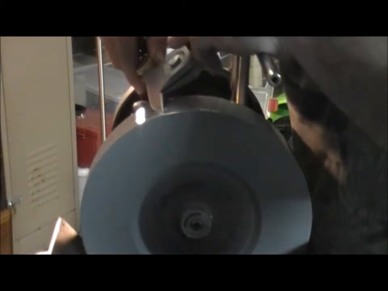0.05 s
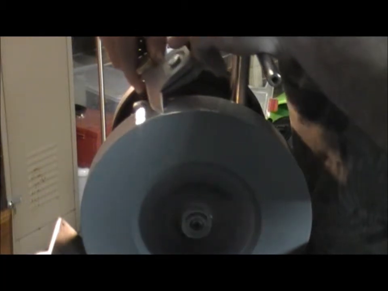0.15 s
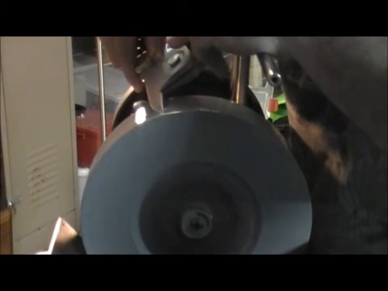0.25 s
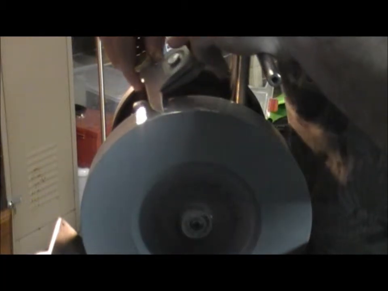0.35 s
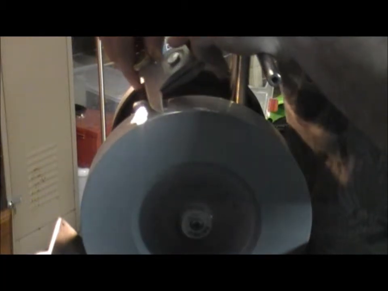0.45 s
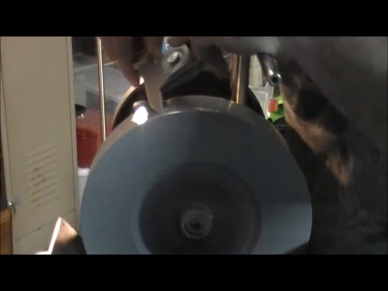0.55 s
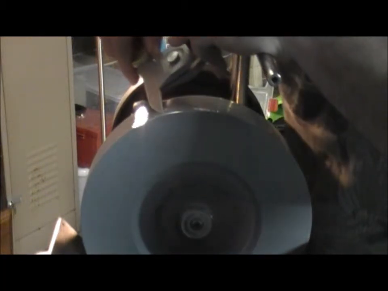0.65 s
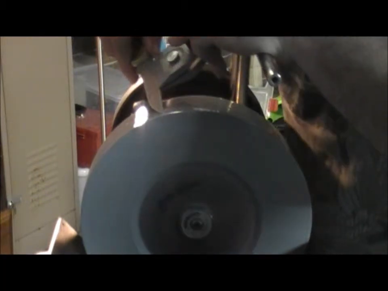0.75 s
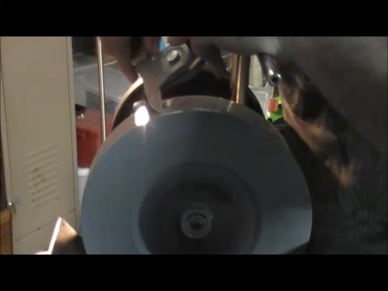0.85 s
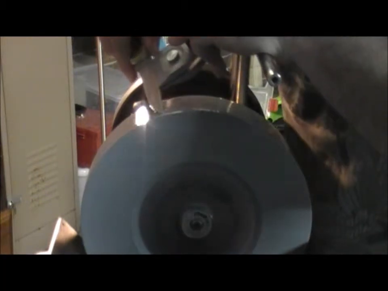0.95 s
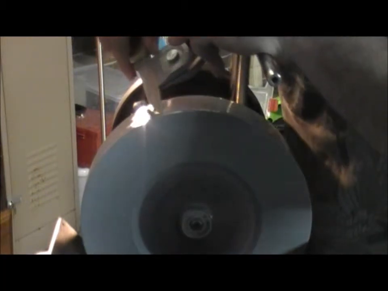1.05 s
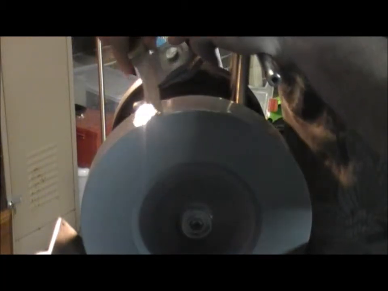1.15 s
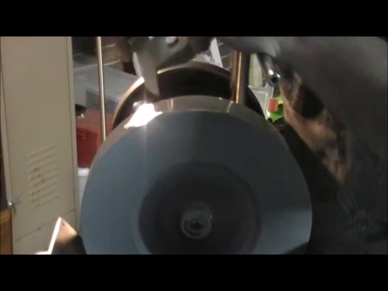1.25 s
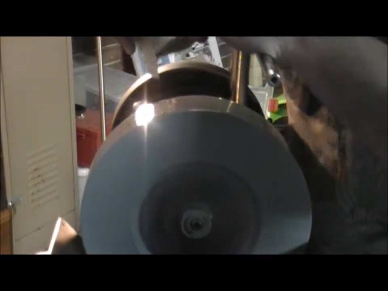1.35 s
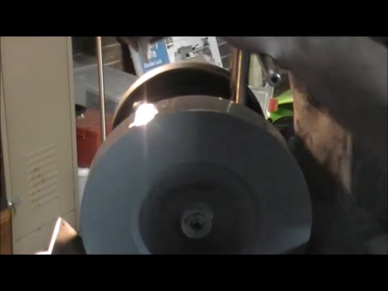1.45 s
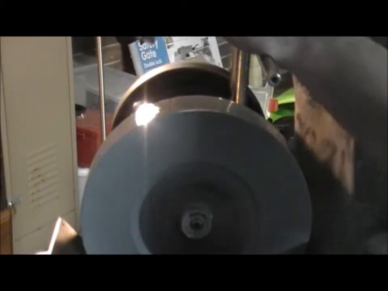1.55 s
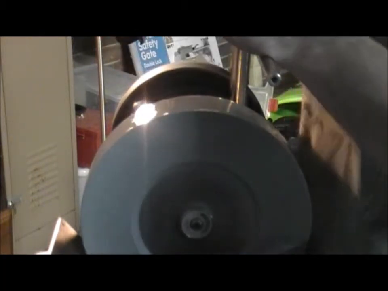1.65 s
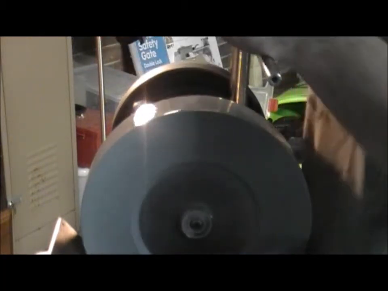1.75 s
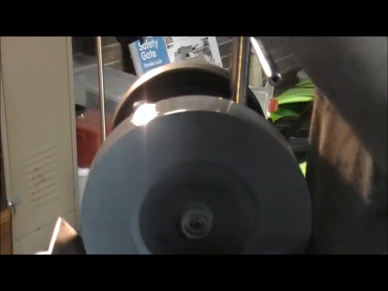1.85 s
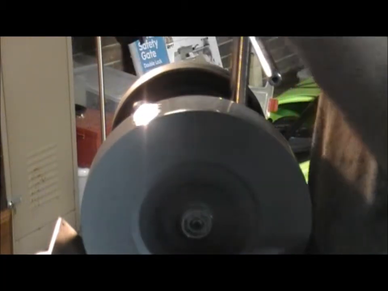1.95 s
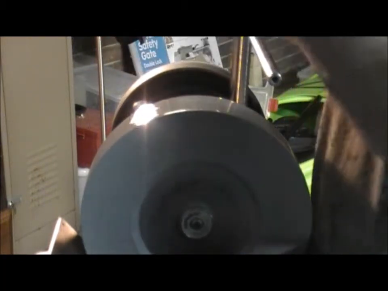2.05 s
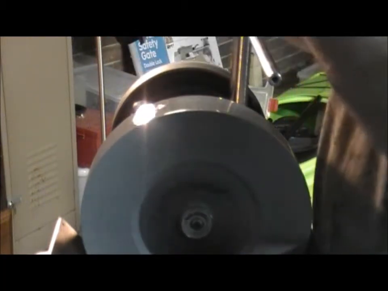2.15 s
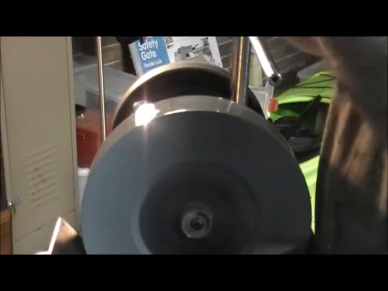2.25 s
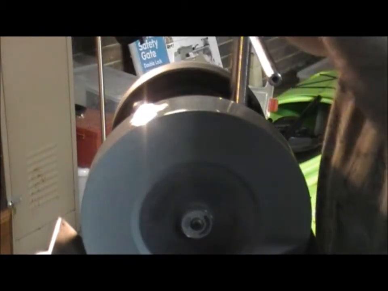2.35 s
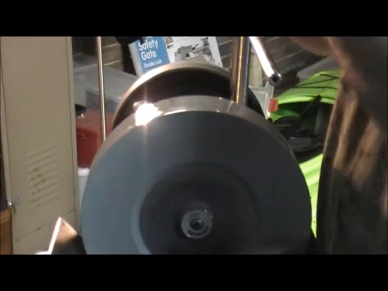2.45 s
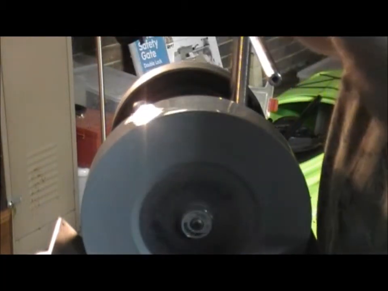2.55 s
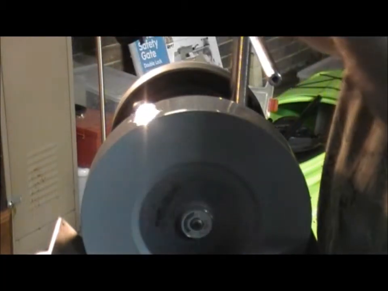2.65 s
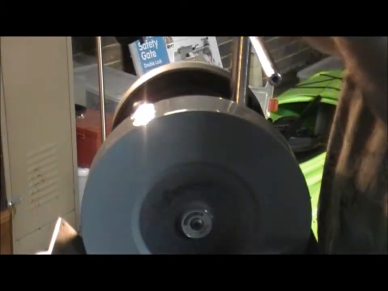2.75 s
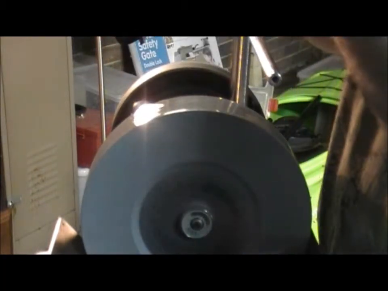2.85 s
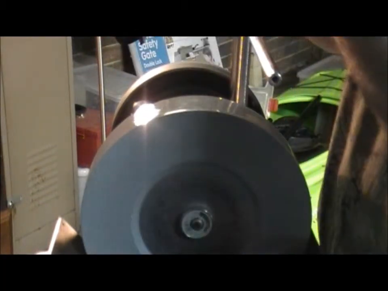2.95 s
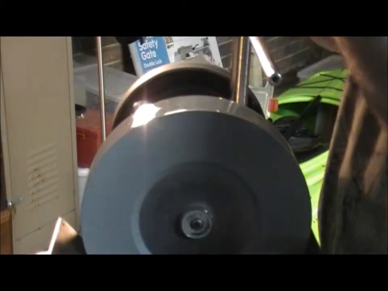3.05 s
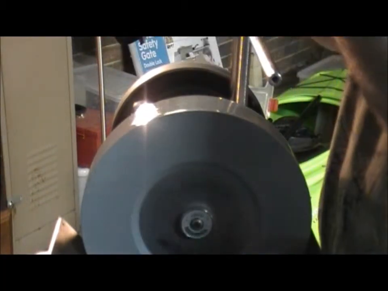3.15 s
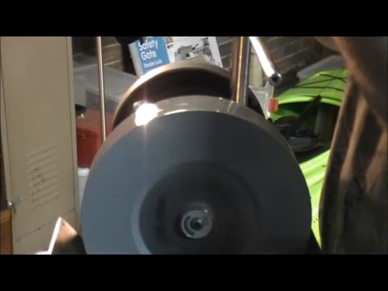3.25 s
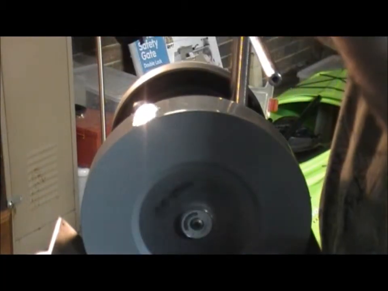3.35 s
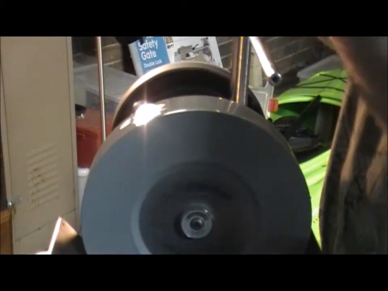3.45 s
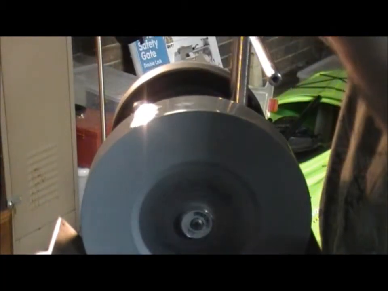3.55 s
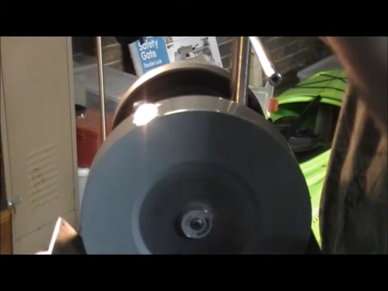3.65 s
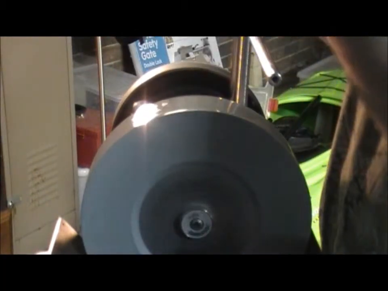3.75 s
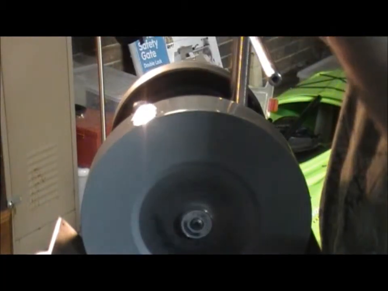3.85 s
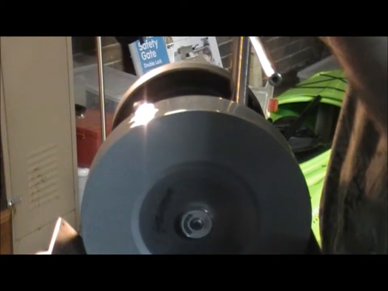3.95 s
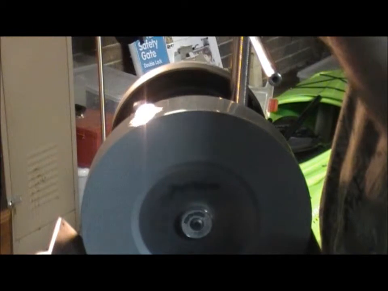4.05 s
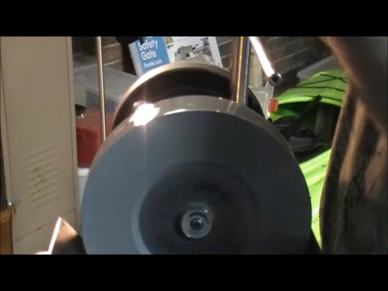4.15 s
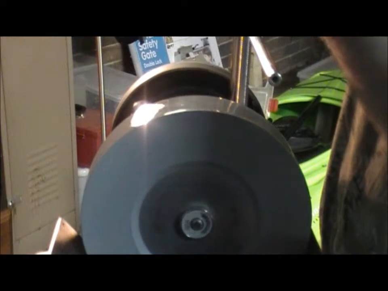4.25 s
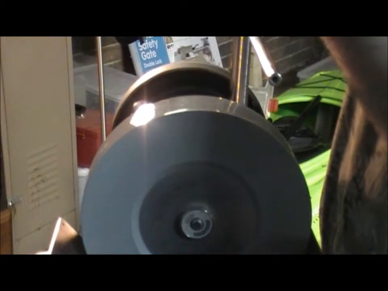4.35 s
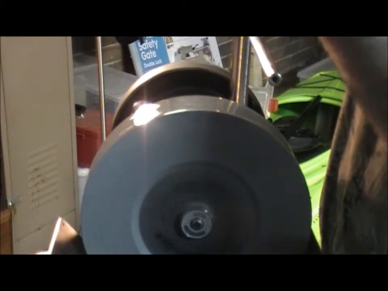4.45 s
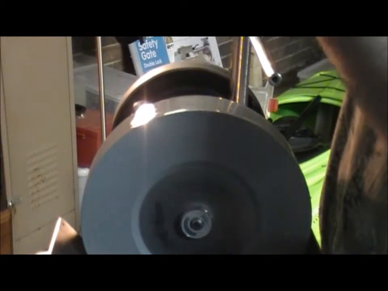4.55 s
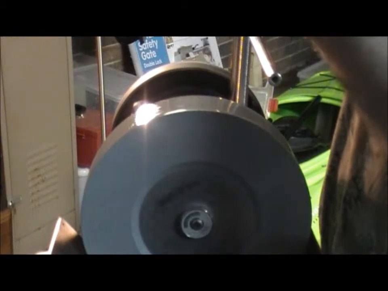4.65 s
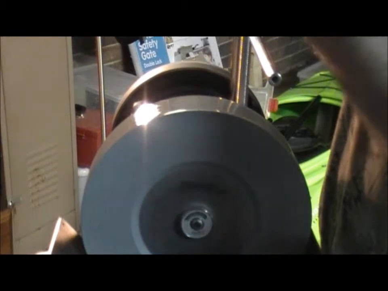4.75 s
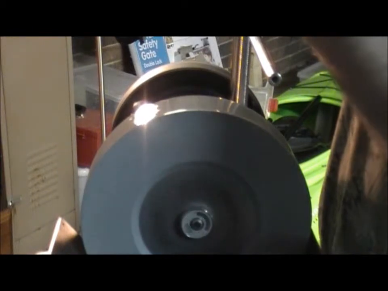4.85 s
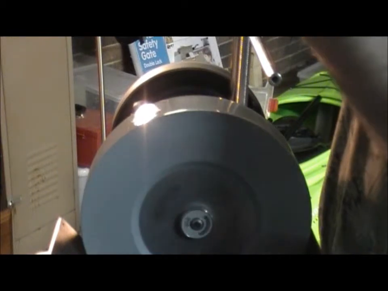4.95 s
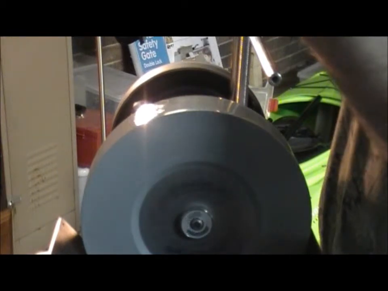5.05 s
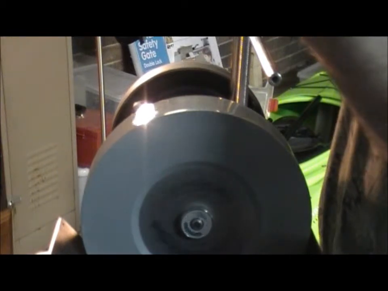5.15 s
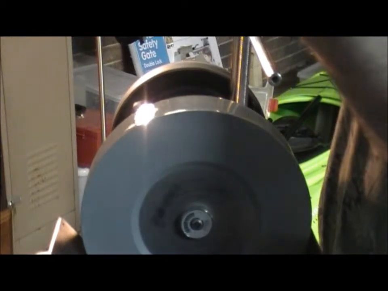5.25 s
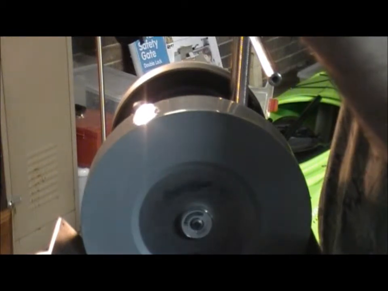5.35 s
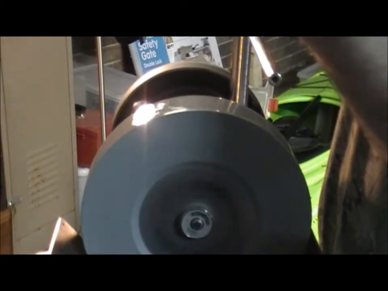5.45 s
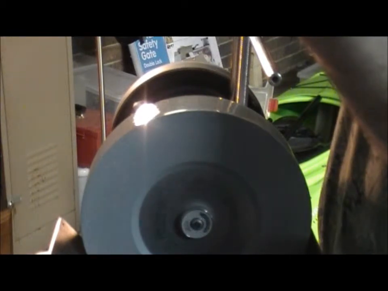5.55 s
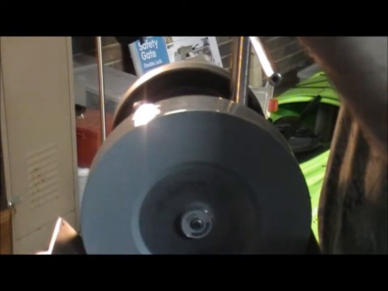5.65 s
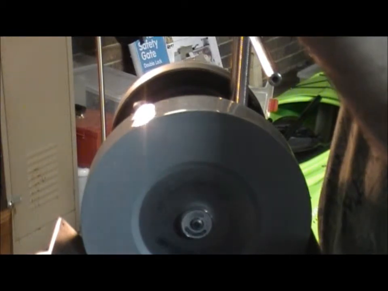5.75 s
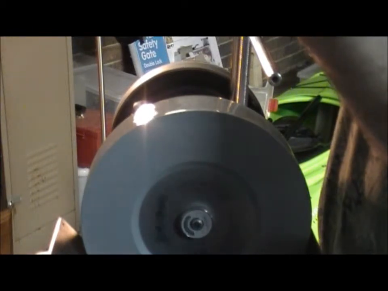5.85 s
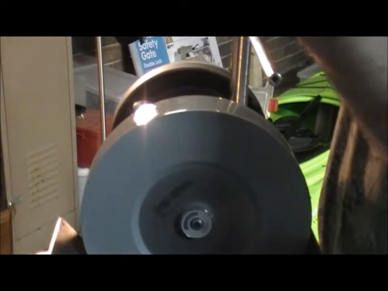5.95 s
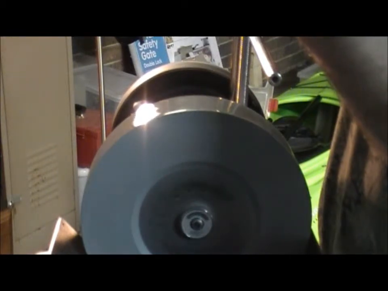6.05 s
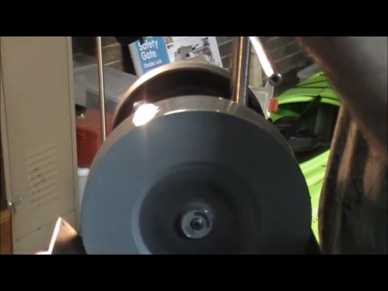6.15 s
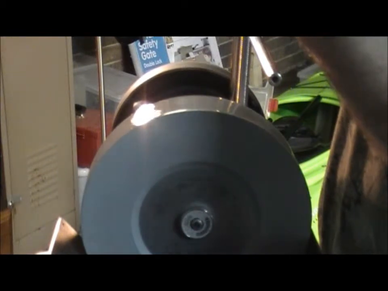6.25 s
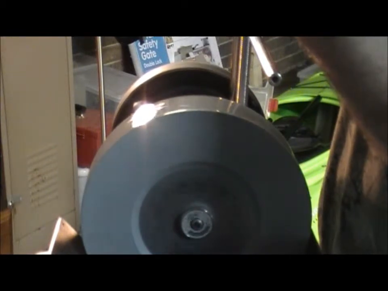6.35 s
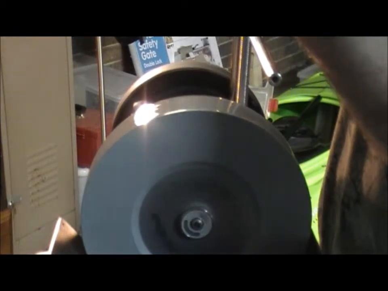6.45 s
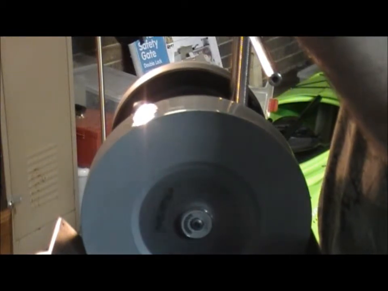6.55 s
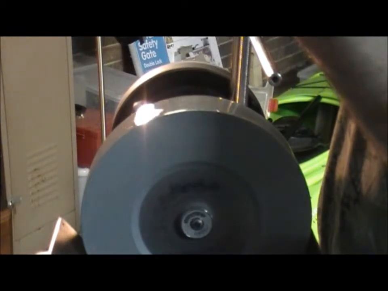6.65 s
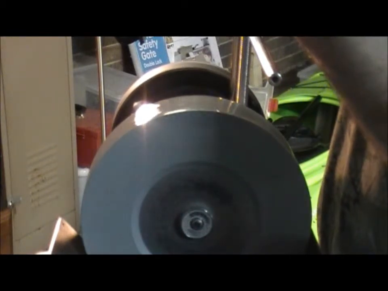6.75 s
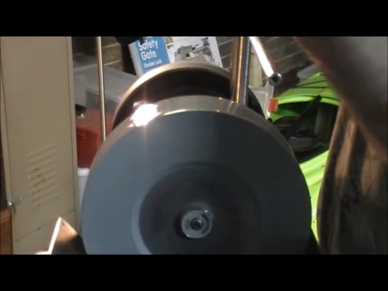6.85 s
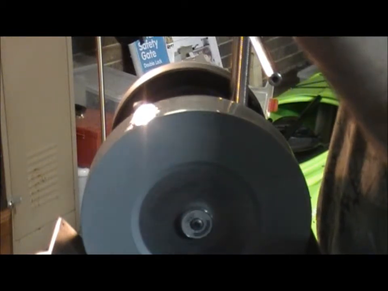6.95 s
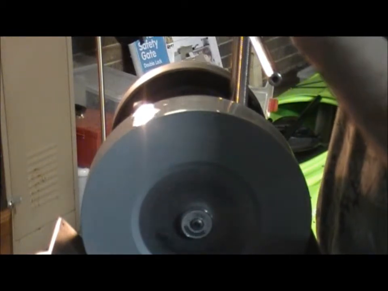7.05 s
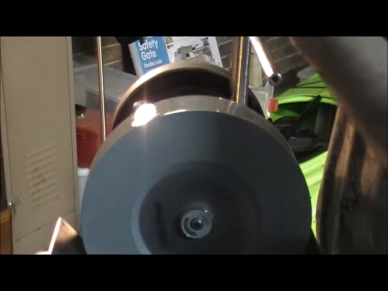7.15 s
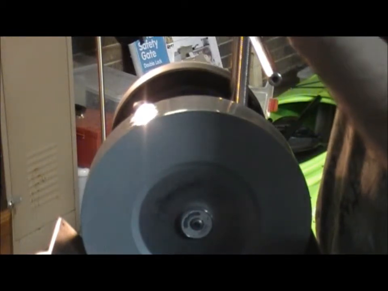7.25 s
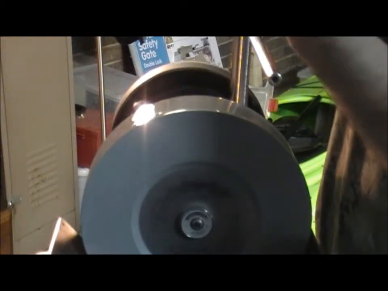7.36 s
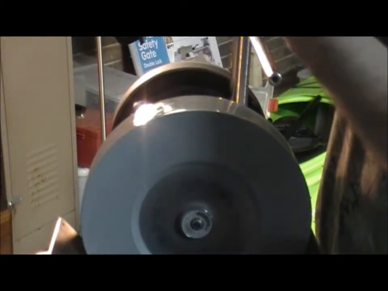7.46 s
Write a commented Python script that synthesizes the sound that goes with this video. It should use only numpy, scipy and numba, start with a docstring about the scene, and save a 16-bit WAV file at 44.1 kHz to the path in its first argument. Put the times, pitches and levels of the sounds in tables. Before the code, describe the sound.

A loud, piercing knife squeal with crackling rasp opens at once over a grinder motor, pressing harder early, flickering, then weakening and cutting off around 1.2 seconds. A short room echo follows. The rest is uninterrupted motor: deep hum, slowly beating whine, rattly ringing bearing, breathy wheel rush and sparse bright spits of water. Close camera microphone, small workshop, ducked by the squeal and swelling back afterwards.

```python
"""A knife blade squeals and scrapes on a wet grinding wheel in a small workshop, then lifts off and rings out.
The squeal is one wavering tone, and filtered noise makes the scrape and the rasp; the tip leaves with a falling chirp.
The motor runs throughout: humming and whining tones, a ball bearing that rings its housing, and rushing air from noise.
Drops spit off the wheel as short noise bursts with pitched ticks.
A close camera turns its gain down under the loud squeal and brings it back up afterwards."""
import sys
import numpy as np
from scipy import signal
from scipy.fft import rfft, irfft
from scipy.io import wavfile
from scipy.ndimage import uniform_filter1d, minimum_filter1d
from numba import njit

SR = 44100
rng = np.random.default_rng(int(sys.argv[2]) if len(sys.argv) > 2 else 0)


def bounce(signal):
    """Save signal as a 16-bit WAV file at the path given by the first command-line argument."""
    frames = np.transpose(np.atleast_2d(signal))
    limited = np.clip(frames, -1, 1)
    pcm = np.round(limited * 32767).astype(np.int16)
    wavfile.write(sys.argv[1], SR, pcm)


N = 331632
T = np.arange(N) / SR
FREQS = np.maximum(np.fft.rfftfreq(N, 1 / SR), 1)
LIFT_S = 1.172  # the moment the blade is off the stone

# How hard the blade is pressed on the stone. Each row: time in seconds, pressure from 0 to 1.
BLADE_PRESSURE = [(0, 0), (.085, 0.33), (.1, 0.55), (.17, .58), (.24, 0.99), (.39, .63), (1.015, .59),
                  (1.04, 0.44), (1.13, 0.18)]


def undb(db):
    """Turn decibels into a gain factor."""
    return 10 ** (np.asarray(db) / 20)


def unit(x):
    """Scale a sound to an average strength (rms) of 1."""
    return x / np.sqrt(np.mean(x ** 2))


def ramp(x, start, end):
    """0 up to start, 1 from end on, a straight line in between."""
    return np.clip((x - start) / max(end - start, 1e-6), 0, 1)


def since(s):
    """Seconds gone by since a moment, 0 before it."""
    return np.maximum(T - s, 0)


def walk(rate):
    """Wander at random: new values, rate of them per second, smoothed twice; the spread is near 1."""
    hold_samples = max(int(SR / rate), 1)
    steps = np.repeat(rng.standard_normal(N // hold_samples + 1), hold_samples)
    smooth = uniform_filter1d(uniform_filter1d(steps, hold_samples), hold_samples)
    return 1.3 * smooth[:N]


def tone(hz):
    """A sine of rms 1 on a steady or moving pitch."""
    cycles = np.cumsum(hz + np.zeros(N)) / SR
    return np.sqrt(2) * np.sin(2 * np.pi * cycles)


def noise(side_db):
    """Stereo white noise, mostly the same left and right; side_db sets how much they differ."""
    mid, side = rng.standard_normal((2, N))
    return unit(mid + undb(side_db) * side * np.array([[1], [-1]]))


def colour(points):
    """Frequency response that joins (Hz, dB) points by straight lines on a log pitch scale."""
    hz, db = np.transpose(points)
    return undb(np.interp(np.log(FREQS), np.log(hz), db))


def low_pass(hz, order):
    """Frequency response that falls 6 dB an octave per order above hz."""
    return 1 / np.sqrt(1 + (FREQS / hz) ** (2 * order))


def resonances(modes):
    """Frequency response of (Hz, width in Hz, dB) modes; neighbours swing in opposite directions."""
    response = 0
    for k, (hz, width, db) in enumerate(modes):
        detuning = (FREQS / hz - hz / FREQS) * hz / width
        response = response + (-1) ** k * undb(db) / (1 + 1j * detuning)
    return response


def shape(x, response):
    """Filter a sound by a frequency response."""
    return irfft(rfft(x) * response, N)


def workshop(x, wet_db, t60_s):
    """Direct sound plus a short dense echo, random at each ear, that dies by 60 dB in t60_s."""
    t = T[:SR // 2]
    echo = rng.standard_normal((2, len(t))) * undb(-60 * t / t60_s) * (t > .003)
    echo /= np.sqrt(np.sum(echo ** 2, axis=1, keepdims=True))
    echoed = signal.fftconvolve(x * np.ones((2, 1)), echo, axes=1)[:, :N]
    return x + undb(wet_db) * echoed


def blade_pressure():
    """The pressure on the stone at every sample, straight between the rows of the table."""
    seconds, pressure = np.transpose(BLADE_PRESSURE)
    return np.interp(T, seconds, pressure)


def knife():
    """Stick and slip lock one blade mode into a squeal while grit rattles the others; pressure flattens the pitch."""
    # Moments when the blade loses its grip or catches again.
    # Each row: centre in seconds, squeal change in dB, half length in seconds.
    skips = [(0.064, -6, 0.0074), (0.085, -6, 0.0069), (0.193, -10, 0.0045), (0.302, -3.5, .012),
             (0.375, -4, 0.0065), (0.433, -10, 0.0092), (0.517, -8.5, 0.006), (0.63, -6, 0.0065),
             (0.803, -4, 0.01), (0.899, -9, 0.0064), (1.03, -12, 0.0027), (1.081, -7, 0.0065),
             (1.098, 8, .004), (1.142, 6, .004)]
    # Ringing of the steel. Each row: pitch in Hz, width in Hz, relative level in dB.
    blade_modes = [(2930, 65, -13.5), (5310, 170, -14), (5810, 65, -9.5), (6060, 72, -7.5), (7240, 91, 3.5),
                   (7510, 87, 5), (8250, 208, 6), (9950, 330, -7)]
    # Grit cutting the edge. Each row: frequency in Hz, relative level in dB.
    grit = [(100, -25.5), (250, -20), (550, -22.5), (2000, -34), (3400, -26.5), (5000, -21), (6700, -31),
            (7800, -16), (8900, -28), (9600, -22.5), (11200, -20.5), (12500, -39), (15500, -48)]
    free_hz, sag_hz = 8297, 139  # squeal pitch at no pressure, and its fall at full pressure
    slip_pressure, grip_pressure = .42, .54  # the edge skates below the first and grips above the second
    skate_db, grip_db = -4.5, 5.5  # squeal while skating and while gripping
    scrape_start_db, scrape_rise_db = -18, 8  # scrape at no pressure, and its rise at full pressure
    lift_time_s, lift_drop_db = 0.04, 12  # time the blade takes to leave, and the squeal's drop meanwhile
    squeal_fade, scrape_fade = 138, 137  # dB per second

    pressure = blade_pressure()
    grip = ramp(pressure, slip_pressure, grip_pressure)
    leaving_s = LIFT_S - lift_time_s
    lifted = ramp(T, leaving_s, LIFT_S)
    skip_db = sum(db * np.exp(-((T - s) / length) ** 2) for s, db, length in skips)
    squeal_db = skate_db + (grip_db - skate_db) * grip + skip_db
    squeal_db = squeal_db - lift_drop_db * lifted - squeal_fade * since(LIFT_S)
    scrape_db = scrape_start_db + scrape_rise_db * pressure + 0.3 * skip_db
    scrape_db = scrape_db - scrape_fade * since(leaving_s)

    # a firm grip gives a pure note; a light one leaves the mode ringing unevenly
    purity = np.clip(0.64 + grip, 0, 1) * (1 - lifted)
    wobble_hz = 6 * walk(45) + 13 * walk(300)
    flicker_db = 1.1 * walk(70) + .5 * walk(400)
    pure = tone(free_hz - sag_hz * pressure + wobble_hz) * undb(flicker_db)
    loose = unit(shape(rng.standard_normal(N), resonances([(8320, 130, 0)]) ** 2))
    squeal = (np.sqrt(purity) * pure + np.sqrt(1 - purity) * 0.49 * loose) * undb(squeal_db)

    grains = noise(side_db=-11) * undb(3.6 * walk(2500) + 0.54 * walk(60))
    # the 1j keeps grit and ringing a quarter turn apart
    steel = (resonances(blade_modes) + 1j * colour(grit)) * low_pass(12000, order=10)
    scrape = unit(shape(grains, steel)) * undb(scrape_db)
    return workshop(squeal, wet_db=-6.5, t60_s=0.41) + scrape


def rasp():
    """Under light pressure, as it lands and leaves, the edge tears through coarse grit: a broad, crackling hiss."""
    start_db, fall_db, fade_db_per_s = -26, 18, 330  # the fade follows the lift
    light, firm = 0.23, .6  # the rasp gets weaker between these pressures
    db = start_db - fall_db * ramp(blade_pressure(), light, firm) - fade_db_per_s * since(LIFT_S)
    grains = noise(side_db=-18) * undb(3.5 * walk(1500) + 1.0 * walk(120))
    spectrum = colour([(60, -2), (220, 4.5), (700, -11), (2000, -11.5), (4000, -2.0), (6000, 9),
                       (10500, 2.5), (12500, -9), (15500, -25.5)])
    return unit(shape(grains, spectrum)) * undb(db)


def hum():
    """The stator hums on the mains; the rotor lags slightly behind and beats against each harmonic."""
    # Magnetic hum at 2, 4, 6 .. times the mains. Each row: level in dB, slip beat in Hz,
    # share of the beating part (0 to 1), left minus right in dB.
    harmonics = [(-34, 1.3, 0.03, 0.4), (-38.5, 1.548, 0.21, 2), (-47, 2.24, 0.12, -4), (-57, 1.3, .1, -14),
                 (-61.5, 3.3, 0.24, -3.5), (-50, 1.01, 0.16, 3.5)]
    mains_hz = 50
    in_step_s = 3.05  # when the stator and rotor parts line up
    out = 0
    for k, (db, beat_hz, share, pan_db) in enumerate(harmonics):
        phase = 2 * np.pi * 2 * mains_hz * (k + 1) * T
        slip = 2 * np.pi * beat_hz * (T - in_step_s)
        line = np.sqrt(2) * (np.cos(phase) + share * np.cos(phase - slip))
        left_right_db = np.array([[pan_db], [-pan_db]]) / 2
        out = out - line * undb(db + .45 * walk(7.2) + left_right_db)
    return out


def rotor():
    """Thin steady tones of the rotor and its fan, and a bearing whine: two close tones in a slow beat."""
    # Tones of the rotor and its fan. Each row: pitch in Hz, level in dB, unsteadiness in dB.
    rotor_tones = [(397.7, -47, 1.5), (770.3, -57, 3), (796.1, -57, 2), (1093.7, -50, 1), (1194.5, -60, 2),
                   (1592, -56.5, 3)]
    whine_hz, whine_db = 659.8, -46.5  # level of the stronger of the two tones
    beat_hz, beat_share, crest_s = .562, 0.56, 3.64  # crest_s: a moment when the beat is loudest
    lines = 0
    for hz, db, wander_db in rotor_tones:
        lines = lines + tone(hz + .5 * walk(4.99)) * undb(db + wander_db * walk(7))
    beat = np.abs(1 + beat_share * np.exp(2j * np.pi * beat_hz * (T - crest_s)))
    whine = tone(whine_hz + 0.8 * walk(8)) * beat * undb(whine_db + 0.41 * walk(12))
    return lines + whine


def bearing():
    """Balls knock the race to and fro and roll roughly between knocks; the housing rings with both."""
    # Resonances of the motor housing. Each row: pitch in Hz, width in Hz, relative level in dB.
    housing = [(1410, 21, 0.5), (1448, 25, -1.5), (1544, 19.5, -3), (1998, 47, -6.5), (2370, 51, -15),
               (2789, 22, -7.5), (2865, 15.4, -4.5), (3677, 20, -6.5), (3800, 41, 1), (3890, 38, 3),
               (3913, 24, 3), (3990, 23, 1), (4014, 19, 0), (4080, 14, 0.5), (4120, 20, -2),
               (4247, 29, -6.5), (4352, 16, -6.5), (4370, 56, -15.5), (4640, 42, -9.5), (4930, 52, -11.5),
               (5214, 44, -11.5), (5440, 45, -10), (6200, 74, -15), (6960, 113, -7.5), (7420, 210, -12)]
    ball_hz, cage_hz = 110.22, 15.7
    passes = np.cumsum(ball_hz * (1 + .0012 * walk(25))) / SR
    # one click per ball, alternately up and down
    clicks = np.diff(np.floor(passes) % 2, prepend=0)
    knocks = unit(clicks * undb(1.9 * walk(110)))
    rolling = noise(side_db=-14) * (1 + 0.31 * np.cos(2 * np.pi * passes))
    cage = 1 + 0.12 * np.cos(2 * np.pi * cage_hz * T)
    ringing = shape((0.56 * knocks + rolling) * cage, resonances(housing))
    return unit(ringing) * undb(-38.5 + .5 * walk(3.95))


def rush():
    """Air from the fan and the wet wheel: a centred rumble under a fluttering hiss, coloured by nearby surfaces."""
    # Colour of the air and wheel rush. Each row: frequency in Hz, relative level in dB.
    air_colour = [(25, -21), (45, -9), (72, 4.5), (140, 0), (280, -5.5), (520, -5.5), (720, -4), (1100, -8),
                  (1550, -11), (2500, -14), (3300, -14.5), (4700, -13.5), (7500, -14.5), (8400, -24.5),
                  (11000, -34.5), (15000, -45.5)]
    bass = low_pass(220, order=2)
    rumble = shape(noise(side_db=-10.5) * undb(1.8 * walk(8.7)), bass)
    hiss = noise(side_db=-7.5) * undb(0.65 * walk(40) + 1.4 * walk(500))
    # small surfaces close by reflect the treble and comb it
    lags_s = rng.uniform(0.002056, .016, size=8)
    reflections = sum(np.exp(-2j * np.pi * FREQS * lag) for lag in lags_s)
    comb = 1 + .17 * (1 - low_pass(700, order=2)) * reflections
    air = rumble + shape(hiss, comb * np.sqrt(1 - bass ** 2))
    return unit(shape(air, colour(air_colour))) * undb(-37.0)


def drops():
    """Each drop is a brief bright spray over a pitched tick; tiny ones patter in between."""
    # The larger drops spitting off the wheel. Each row: start in seconds, relative level in dB,
    # tick against spray in dB (before a lift that all ticks share), tick pitch in Hz.
    large_drops = [(1.401, -31, -5, 8300), (2.0398, -31.5, 1, 7290), (2.6125, -31, -5, 7100),
                   (2.6966, -24, 2, 7500), (2.8055, -33, 1, 6960), (3.3209, -33, -1, 6860),
                   (3.351, -31, 0, 7420), (3.4451, -29, -7, 6960), (3.5408, -29, -8, 7380),
                   (3.6367, -29.5, -3, 5410), (3.713, -34, 4, 5410), (4.0003, -31, -1, 7360),
                   (4.4423, -29.5, -6, 7040), (4.6507, -29, 3, 7060), (5.0754, -28, -5, 10300),
                   (5.0936, -27.5, 10, 7230), (5.3224, -31, 13.5, 6000), (5.95, -32, 0, 7460),
                   (6.2745, -33, 2, 6910), (6.5989, -33, 3, 7250), (6.6508, -30, -5, 6980),
                   (7.0194, -29, -5, 7110), (7.2469, -30.5, -2, 7320)]
    spray, ticks = np.zeros((2, N))
    t = T[:SR // 40]
    fade = np.exp(-t / 0.0019)
    grains = rng.standard_normal((len(large_drops), len(t)))
    for (s, db, tick_db, hz), grain in zip(large_drops, grains):
        i = int(s * SR)
        burst = grain * fade * undb(db - 2)
        band = signal.butter(2, [.92 * hz, 1.14 * hz], "bandpass", fs=SR, output="sos")
        spray[i:i + len(t)] += burst
        ticks[i:i + len(t)] += signal.sosfilt(band, burst) * undb(tick_db + 8.5)
    # about 24 tiny drops a second, at random moments and levels
    tiny = (rng.random(N) < 24 / SR) * undb(-45 + 3.5 * rng.standard_normal(N))
    patter = signal.fftconvolve(tiny, fade)[:N] * rng.standard_normal(N)
    spray_colour = colour([(3000, -29), (7000, -1.0), (9000, 8.5), (11000, -3.5), (13500, -10.5), (16000, -22)])
    bright = shape(spray + patter, spray_colour)
    return workshop(bright + ticks, wet_db=-3.0, t60_s=.16)


def tip():
    """The tip slides off the rim: a rough chirp that falls and swells until the blade is free."""
    slide_s, start_hz, end_hz = .075, 2840, 2484
    peak_db, swell_db_per_s, fade_db_per_s = -30, 190, 1000  # it swells up to the lift, then stops quickly
    slide = ramp(T, LIFT_S - slide_s, LIFT_S)
    hz = start_hz + (end_hz - start_hz) * slide
    db = peak_db - swell_db_per_s * np.maximum(LIFT_S - T, 0) - fade_db_per_s * since(LIFT_S)
    return tone(hz + 70 * walk(450)) * undb(db + 3.9 * walk(150))


def scene():
    """The knife on the wheel over the running grinder, whose bass is thin at first and then fills in."""
    thin_db, fill_start_s, fill_end_s = -9.5, 1.36, 1.85
    motor = hum() + rotor() + bearing() + rush()
    bass = shape(motor, low_pass(142, order=4))
    bass_db = thin_db * (1 - ramp(T, fill_start_s, fill_end_s))
    grinder = (motor - bass) + bass * undb(bass_db)
    return knife() + tip() + rasp() + grinder + drops()


@njit
def hold(excess, attack, release):
    """Gain reduction in dB: it climbs quickly to the excess level and sinks at a steady pace."""
    out, cut = np.empty(len(excess)), max(excess[0], 0.)
    for i in range(len(excess)):
        if excess[i] > cut:
            cut = cut + attack * (excess[i] - cut)
        else:
            cut = max(cut - release, 0.)
        out[i] = cut
    return out


def record(dry):
    """The camera's gain control ducks loud sound, waits, then recovers, the last part slowly; the top is cut."""
    ceiling_db, attack_s, wait_s = -5.0, .0015, 0.079
    fast_db_per_s, slow_db_per_s, slow_share = 30.4, 6.6, 0.24
    top_hz = 15700
    power = uniform_filter1d(np.max(dry ** 2, axis=0), size=221)
    headroom_db = ceiling_db - 10 * np.log10(np.maximum(power, 1e-12))
    # the least headroom of the last moments counts, so recovery waits
    half = int(wait_s * SR / 2)
    excess_db = -minimum_filter1d(headroom_db, size=2 * half + 1, origin=half, mode="nearest")
    attack = 1 / (attack_s * SR)
    fast = hold(excess_db, attack, fast_db_per_s / SR)
    slow = hold(excess_db, attack, slow_db_per_s / SR)
    ducked = dry * undb(-(1 - slow_share) * fast - slow_share * slow)
    top_cut = signal.ellip(8, .2, 80, top_hz, fs=SR, output="sos")
    return signal.sosfilt(top_cut, ducked)


dry = scene()
out = record(dry)
bounce(out)
```